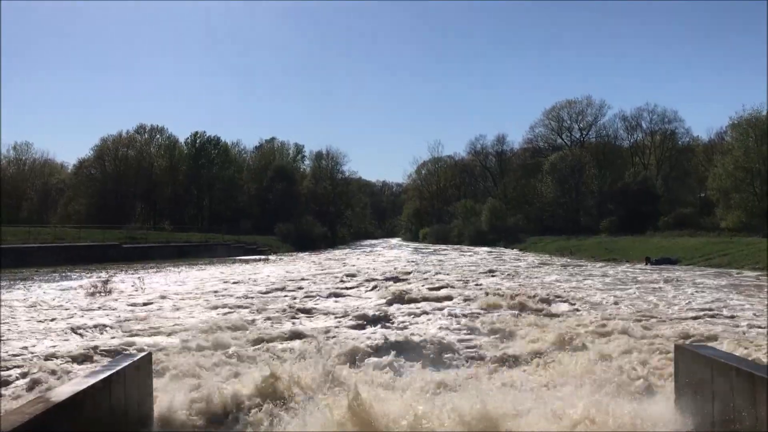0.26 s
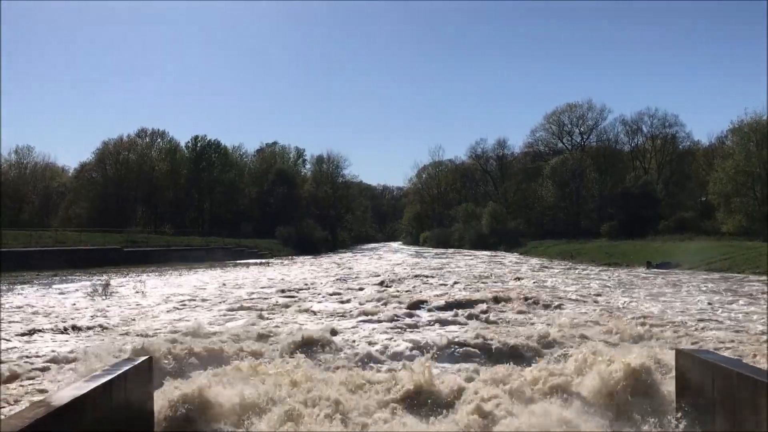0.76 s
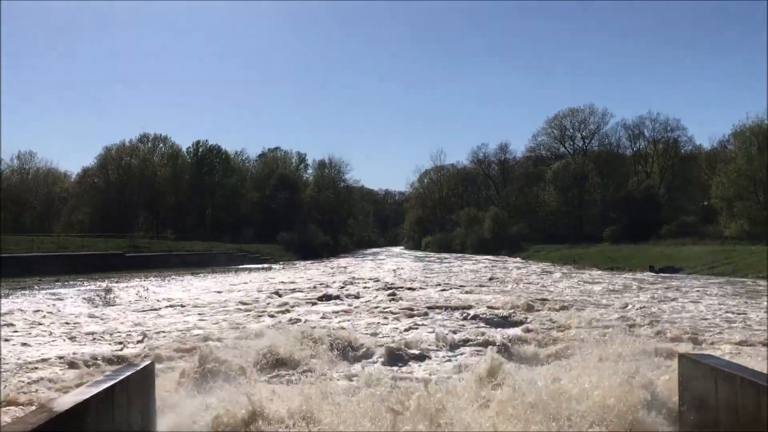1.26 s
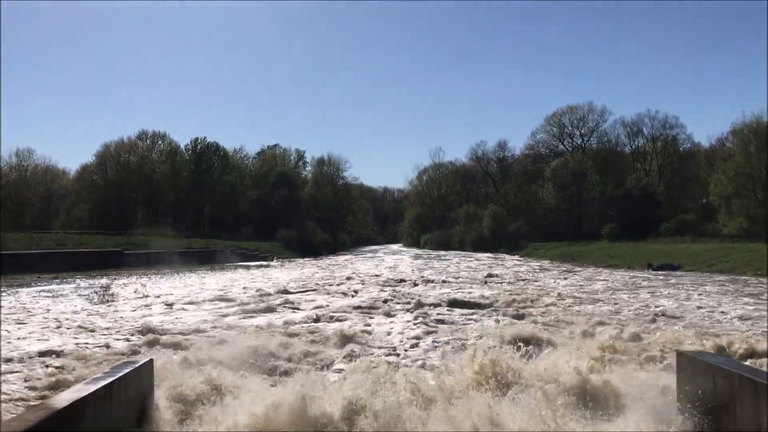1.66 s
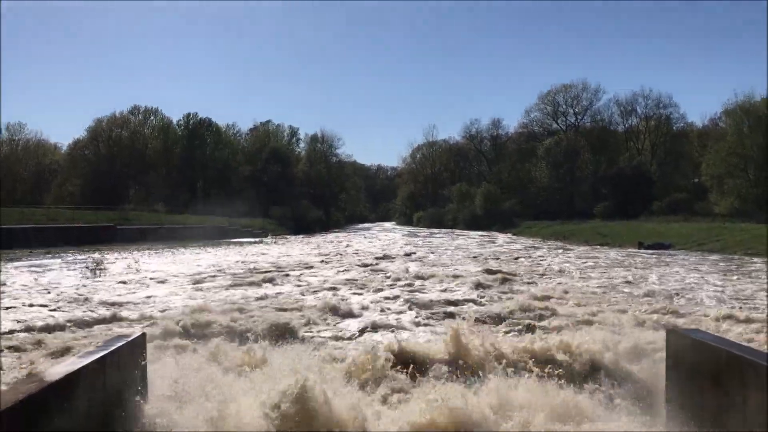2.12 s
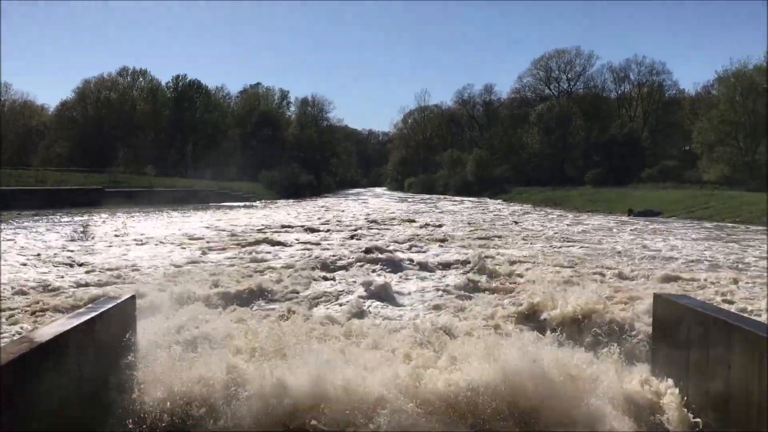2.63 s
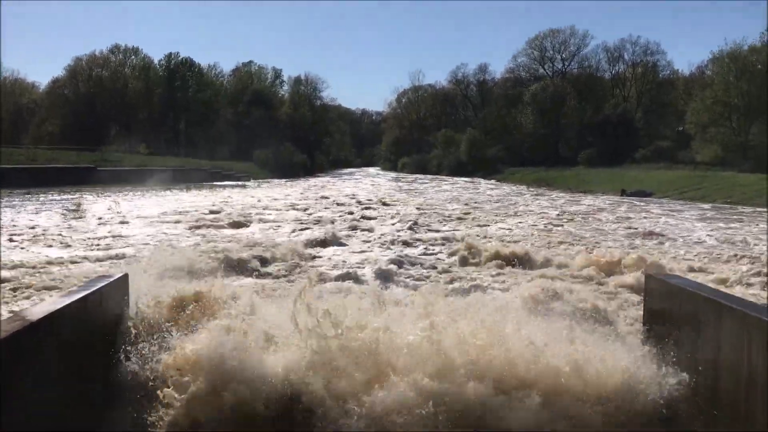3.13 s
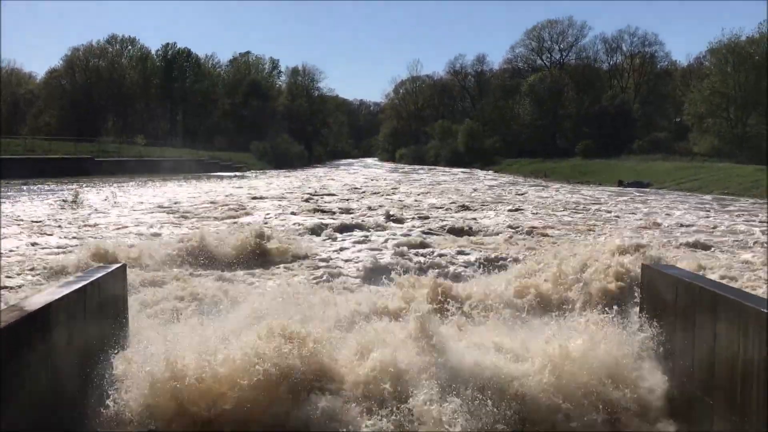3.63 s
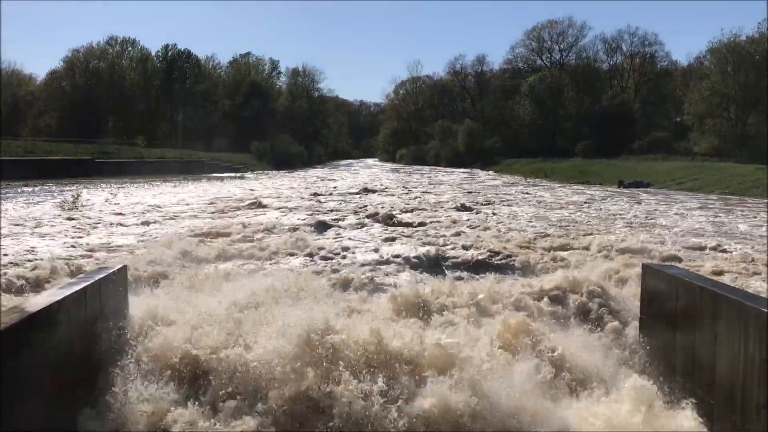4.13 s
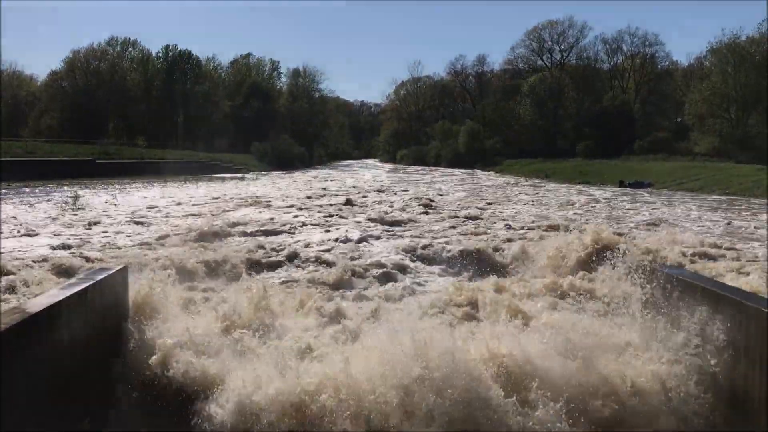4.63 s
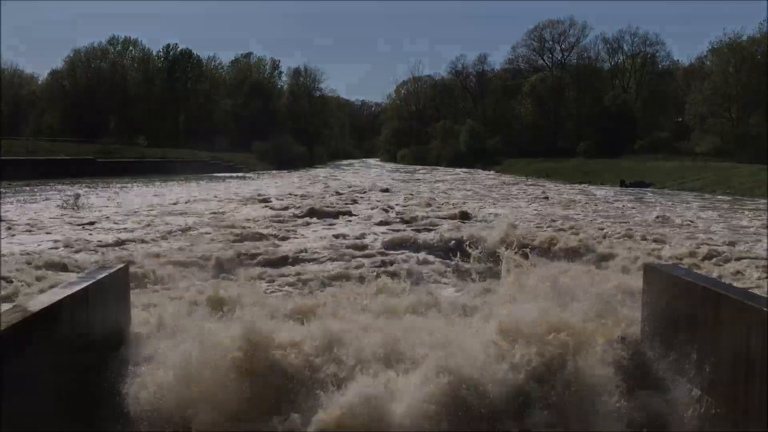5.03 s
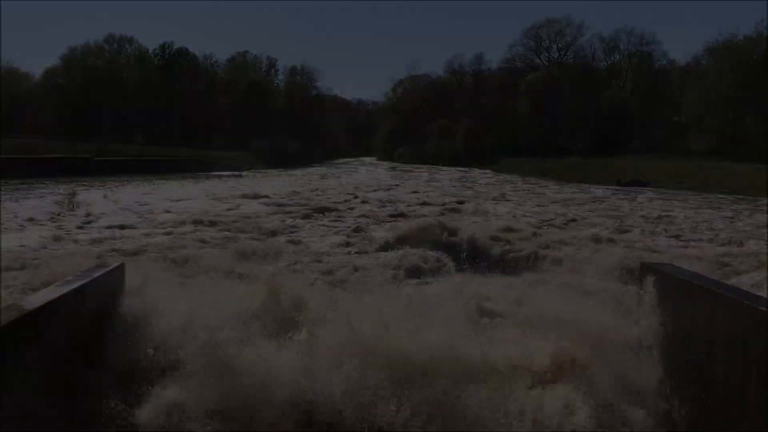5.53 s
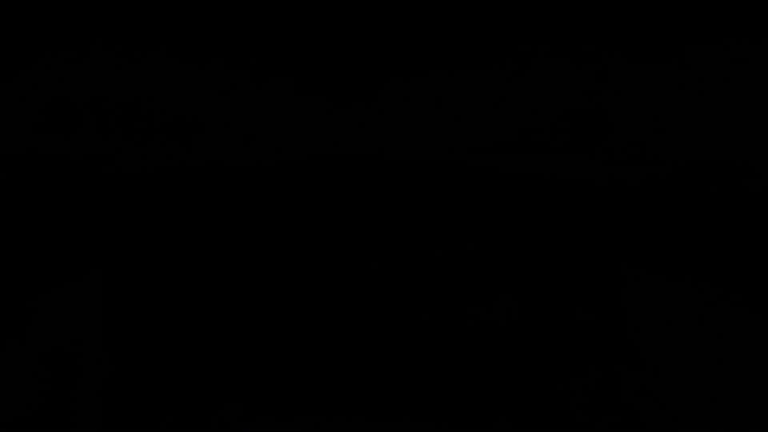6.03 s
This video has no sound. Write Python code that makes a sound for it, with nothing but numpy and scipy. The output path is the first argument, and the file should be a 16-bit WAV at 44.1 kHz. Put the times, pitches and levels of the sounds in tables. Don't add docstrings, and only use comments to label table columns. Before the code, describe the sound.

A dense, continuous roar of churning white water outdoors, lumpy with plunging surges, gradually fades out; a very quiet boat drone follows.

```python
import sys
import numpy as np
from scipy import signal
from scipy.fft import rfft, irfft
from scipy.io import wavfile
from scipy.ndimage import uniform_filter1d

SR = 44100
rng = np.random.default_rng(int(sys.argv[2]) if len(sys.argv) > 2 else 0)


def boost_factor(decibels):
    exponent = np.asarray(decibels, float) / 20
    return 10 ** exponent


def persist_wave(psi):
    counts = np.round(np.clip(psi, -1, 1) * 32767).astype(np.int16)
    wavfile.write(sys.argv[1], SR, np.atleast_2d(counts).T)


N = 276507

# (frequency [Hz], level [dB per Hz])
ROAR_TONE = [(280, -23.5), (480, -16.5), (515, -4.5), (671, -0.5), (794, -2), (1330, 0), (1970, -4),
             (2550, -18.5), (3320, -48.5), (5610, -120)]


def roar():
    wash = churning(ROAR_TONE, shared_db=-0.44, own_db=0.43, own_rate=5.7)
    ringing = bubbles(5000, cycles=10.0, spread_db=2.5, low_hz=459, high_hz=2444)
    sound = colour(wash + boost_factor(-0.5) * ringing, ROAR_TONE)
    return boost_factor(-18 + flow() + crests()) * sound


# (frequency [Hz], level [dB per Hz])
RUMBLE_TONE = [(15, -39.5), (25, -19.5), (42, -3), (59, 3), (103, -0.5), (135, -8), (180, -42), (300, -120)]
# (time [s], rise [dB], length [s])
PLUNGES_SEEN = [(0.157, 3.5, 0.1), (0.527, 2, 0.059), (0.929, 3.5, 0.12), (1.151, 3, 0.079),
                (1.271, 1, 0.051), (1.628, 6.5, 0.041), (1.706, 7.5, 0.037), (1.832, 5.5, 0.049),
                (1.995, 6.5, 0.041), (2.141, 5, 0.077), (2.288, 2.5, 0.089), (2.436, 1, 0.041),
                (2.794, 2.9, 0.11), (2.969, 3.7, 0.055), (3.211, 8, 0.043), (3.339, 6, 0.059),
                (3.629, 6.5, 0.05), (3.735, 1, 0.045), (3.849, 2.9, 0.042), (3.93, 5, 0.044),
                (4.124, 6.3, 0.06), (4.389, 6.5, 0.059), (4.802, 2.5, 0.093), (5.015, 5.0, 0.057),
                (5.117, 3, 0.042), (5.74, 1, 0.049)]


def rumble():
    sound = churning(RUMBLE_TONE, shared_db=-0.4, own_db=-0.3, own_rate=5.8)
    sound = steadied(sound, span_s=0.066, share=0.98)
    return boost_factor(-22 + flow() + heaves(PLUNGES_SEEN)) * sound


# (frequency [Hz], level [dB per Hz])
SLOSH_TONE = [(79, -30), (135, -1), (465, -6.5), (600, -31.5), (1020, -120)]
# (time [s], rise [dB], length [s])
WALL_SLAPS = [(0.187, 1, 0.077), (1.261, 3.8, 0.054), (1.62, 2, 0.042), (1.736, 2, 0.044),
              (2.365, 2.5, 0.046), (2.594, 2.5, 0.06), (2.936, 1, 0.065), (3.089, 2.2, 0.067),
              (3.871, 3, 0.1), (3.992, 1.5, 0.073), (4.181, 1.5, 0.061), (4.816, 6.5, 0.03),
              (4.918, 2, 0.058), (5.181, 3.1, 0.051), (5.319, 2.5, 0.049), (5.794, 3, 0.071)]


def slosh():
    sound = churning(SLOSH_TONE, shared_db=0.5, own_db=1.2, own_rate=5.0)
    sound = steadied(sound, span_s=0.067, share=0.72)
    return boost_factor(-24 + flow() + heaves(WALL_SLAPS)) * sound


# (frequency [Hz], level [dB per Hz])
SPRAY_TONE = [(1500, -41), (2400, -5.5), (3100, -1.5), (3750, -4), (4500, -1), (4800, -4.5), (5000, -5),
              (6000, -8), (7400, -14.5), (9900, -19), (10300, -25), (11600, -26), (13300, -29.5),
              (17000, -28)]


def spray():
    mist = churning(SPRAY_TONE, shared_db=-0.54, own_db=0.8, own_rate=16.0)
    ticking = bubbles(9000, cycles=2.3, spread_db=0.5, low_hz=2555, high_hz=11700)
    sound = case_echo(colour(mist + boost_factor(-5) * ticking, SPRAY_TONE))
    return boost_factor(-28.5 + 1.2 * flow() + 0.3 * crests()) * sound


# (time [s], rise [dB], length [s])
BREAKING_CRESTS = [(0.369, 1.6, 0.065), (0.706, 0.4, 0.049), (1.056, 1.8, 0.052), (1.183, 1.5, 0.06),
                   (1.747, 2, 0.049), (2.05, 1.5, 0.046), (2.288, 0.7, 0.055), (2.58, 2.3, 0.11),
                   (2.788, 0.9, 0.031), (3.12, 0.1, 0.088), (3.204, 4.5, 0.032), (3.451, 0, 0.093),
                   (3.668, 2.7, 0.067), (3.888, 5.2, 0.022), (4.206, 1.5, 0.046), (4.875, 2, 0.026),
                   (4.945, 1, 0.025), (5.691, 3, 0.071)]


def crests():
    return heaves(BREAKING_CRESTS)


# (time [s], level [dB])
FLOW_LEVEL = [(0, -0.1), (1.0, 0.17), (2.0, -0.27), (2.7, -0.04), (3.3, -0.06), (3.8, 0.34), (4.4, 0.3),
              (5.0, 0.15), (5.5, 0), (6.1, 2.1)]


def flow():
    return np.interp(np.arange(N) / SR, *np.transpose(FLOW_LEVEL))


# (frequency [Hz], level [dB per Hz])
BOAT_TONE = [(24, -35), (40, -3), (114, 0.5), (230, -12), (442, -32.5), (693, -27), (1090, -24.5),
             (1430, -26), (1880, -26), (3190, -42), (15800, -67.5)]


def boat():
    sound = colour(rng.standard_normal(N), BOAT_TONE)
    return boost_factor(-55) * steadied(sound, span_s=0.0304, share=0.7)


def churning(spectrum, shared_db, own_db, own_rate):
    edges = np.geomspace(spectrum[0][0], min(spectrum[-1][0], 0.45 * SR), num=12)
    white = rng.standard_normal((2, N))
    together = drift(3.5)
    out = 0
    for k, (low, high) in enumerate(zip(edges, edges[1:])):
        band_pass = signal.butter(2, [low, high], "band", fs=SR, output="sos")
        band = signal.sosfilt(band_pass, white[k % 2])
        out = out + band * boost_factor(shared_db * together + own_db * drift(own_rate))
    return colour(out + 0.015 * white[0], spectrum)


def bubbles(per_s, cycles, spread_db, low_hz, high_hz):
    sizes = boost_factor(spread_db * np.minimum(rng.exponential(1, N), 5)) * rng.choice([-1, 1], N)
    born = rng.random(N) < per_s * boost_factor(1.5 * drift(5.0)) / SR
    pitch_group = rng.integers(0, 20, N)
    out = 0
    for k, hz in enumerate(np.geomspace(low_hz, high_hz, num=20)):
        decay = boost_factor(-60 * hz / (cycles * SR))
        turn = 2 * np.pi * hz / SR
        kicks = sizes * born * (pitch_group == k) + 1e-18
        ring = [1, -2 * decay * np.cos(turn), decay * decay]
        out = out + signal.lfilter([0, np.sin(turn)], ring, kicks)
    return rms_one(out)


def heaves(rows):
    s, rise_db, length = np.transpose(rows)
    t = np.arange(0, N + 40, 40) / SR
    from_peak = (t - s[:, None]) / length[:, None]
    swell = rise_db @ np.exp(-4 * np.log(2) * from_peak ** 2)
    return np.interp(np.arange(N) / SR, t, swell)


def drift(rate):
    r = np.exp(-80 * np.pi * rate / SR)
    chance = rng.standard_normal(N // 40 + 4002)
    slow = signal.lfilter([1], [1, -2 * r, r * r], chance)[4000:]
    return np.interp(np.arange(N) / 40, np.arange(len(slow)), rms_one(slow - slow.mean()))


def steadied(x, span_s, share):
    span = int(span_s * SR)
    swell = uniform_filter1d(uniform_filter1d(x ** 2, span), span)
    return rms_one(x / (swell + 0.02) ** (share / 2))


def colour(x, spectrum):
    lines = rfft(x)
    trend = np.sqrt(uniform_filter1d(np.abs(lines) ** 2, size=301))
    hz = np.maximum(np.arange(len(lines)) * SR / len(x), 1)
    return rms_one(irfft(lines / trend * boost_factor(at_hz(spectrum, hz)), len(x)))


def at_hz(points, hz):
    known_hz, level = np.transpose(points)
    return np.interp(np.log(hz), np.log(known_hz), level)


def rms_one(x):
    return x / np.sqrt(np.mean(x ** 2) + 1e-20)


def case_echo(x):
    dip_hz, echo, ring = 2500, 0.56, 0.47
    turn = np.exp(-2j * np.pi * np.arange(N // 2 + 1) * SR / N / dip_hz)
    return rms_one(irfft(rfft(x) * (1 - echo * turn) / (1 - ring * turn), N))


def fader():
    steps_per_s, step_at_s = 29.97, 6.0345
    out_end_s, out_length_s = 6.0435, 5.0
    in_zero_s, in_first_s, in_length_s = 6.125, 6.172, 0.1
    t = np.arange(N) / SR
    held = step_at_s + np.floor((t - step_at_s) * steps_per_s) / steps_per_s
    out = np.clip((out_end_s - held) / out_length_s, 0, 1)
    back = (t > in_first_s) * np.maximum(held - in_zero_s, 0) / in_length_s
    return out, back


def scene():
    out, back = fader()
    torrent = roar() + rumble() + slosh() + spray()
    return (out * torrent + back * boat())[None]


STARVED_FRAMES = [6, 13, 18, 31, 44, 57, 65, 69, 70, 76, 80, 82, 109, 119, 159, 160, 223, 225, 230, 261,
                  269, 271, 277, 290]
# (frequency [Hz], step over the roar's lines or 4.7 times the spray's [dB])
COARSE_STEP = [(100, 7), (300, 4.5), (800, 7), (1700, 6.5), (2100, 2.5), (3000, -0.5), (4500, -1),
               (6000, -5.5), (16000, -6)]


def starve(x):
    frame, first, up, down = 1024, 830, 160, 147
    fast = signal.resample_poly(x, up, down)
    n, k = np.arange(2 * frame) + 0.5, np.arange(frame) + 0.5
    window = np.sin(np.pi * n / 2 / frame)
    basis = np.sqrt(2 / frame) * window * np.cos(np.pi / frame * np.outer(k, n + frame / 2))
    spans = first + frame * np.array(STARVED_FRAMES)[:, None] + np.arange(2 * frame)
    lines = fast[spans] @ basis.T
    roar_rms = np.sqrt(np.mean(lines[:, 20:80] ** 2, axis=1, keepdims=True))
    spray_rms = np.sqrt(np.mean(lines[:, 110:210] ** 2, axis=1, keepdims=True))
    line_hz = k * SR * up / down / 2 / frame
    step = np.where(k < 100, roar_rms, 4.7 * spray_rms) * boost_factor(at_hz(COARSE_STEP, line_hz))
    whole_steps = np.floor((np.abs(lines) / step) ** 0.75 + 0.4054)
    kept = np.sign(lines) * step * whole_steps ** (4 / 3)
    error = np.zeros(len(fast))
    np.add.at(error, spans, (kept - lines) @ basis)
    return x + signal.resample_poly(error, down, up)[:N]


def band_limit(x):
    return signal.sosfilt(signal.butter(12, 15760, fs=SR, output="sos"), x)


def record(dry):
    t = np.arange(N) / SR
    bass_cut = signal.butter(2, 34.6, "high", fs=SR, output="sos")
    heard = signal.sosfilt(bass_cut, dry[0])
    hiss = boost_factor(-100) * rng.standard_normal(N)
    unmuted = (t < 6.068) | (t > 6.152)
    mix = (starve(heard) + hiss) * unmuted
    return band_limit(mix[None])


dry = scene()
out = record(dry)
persist_wave(out)
```